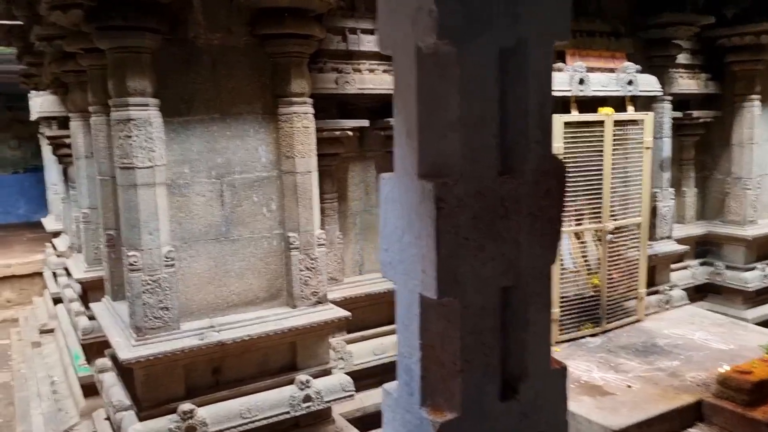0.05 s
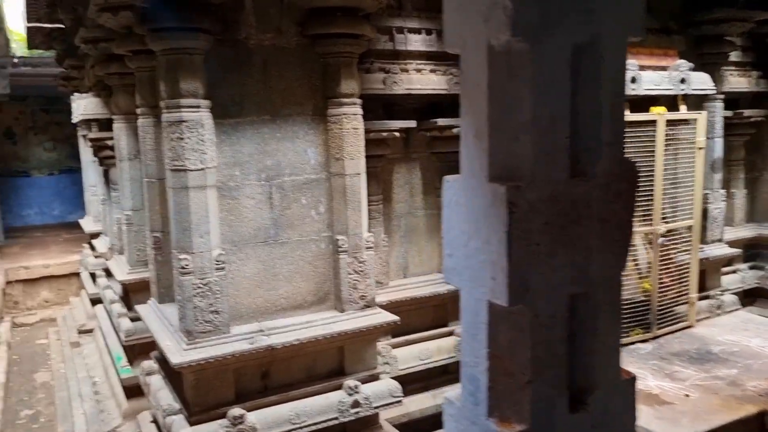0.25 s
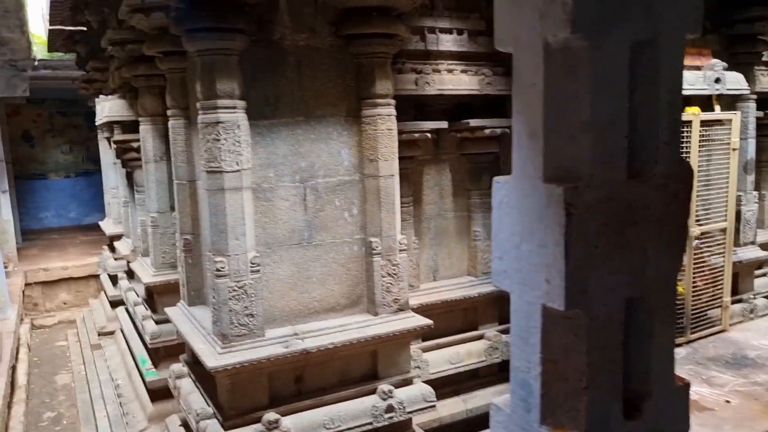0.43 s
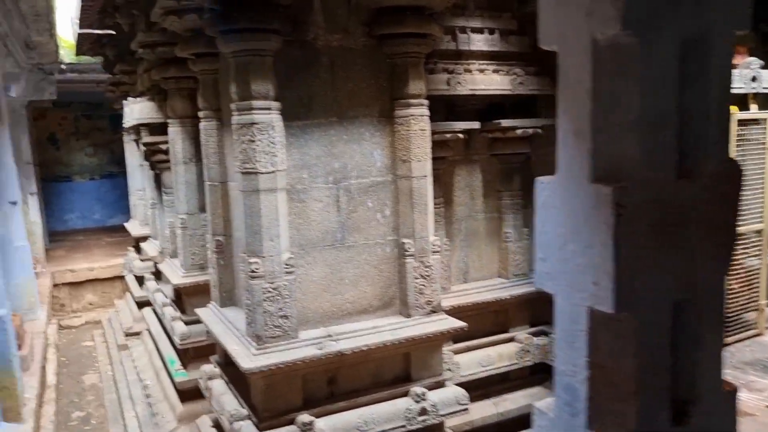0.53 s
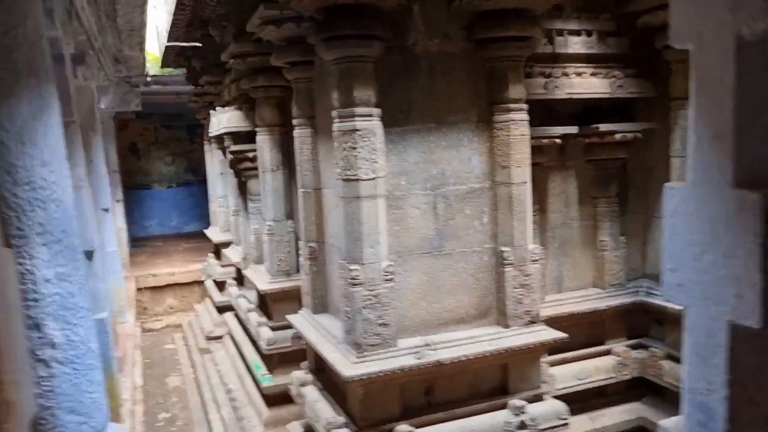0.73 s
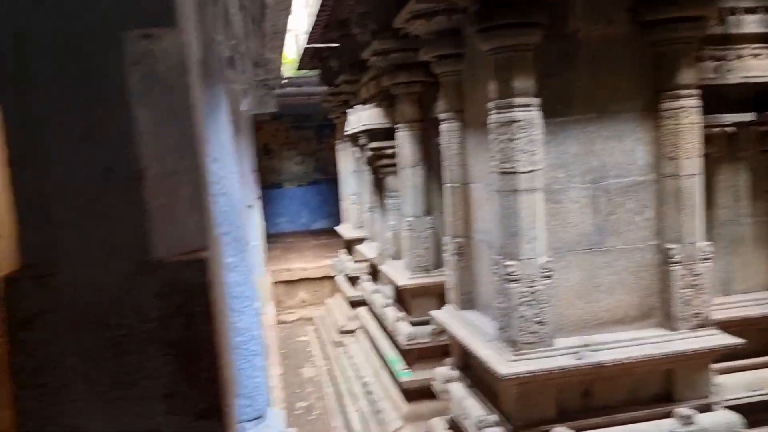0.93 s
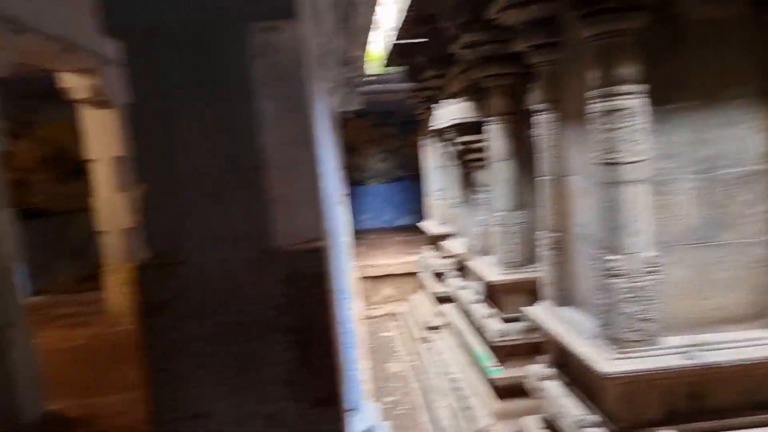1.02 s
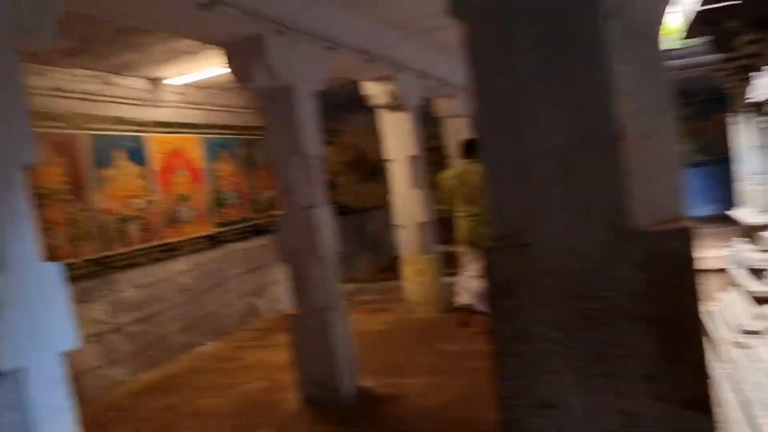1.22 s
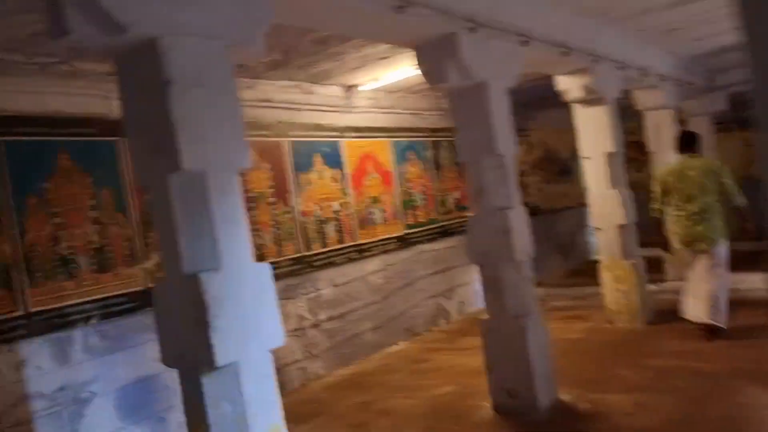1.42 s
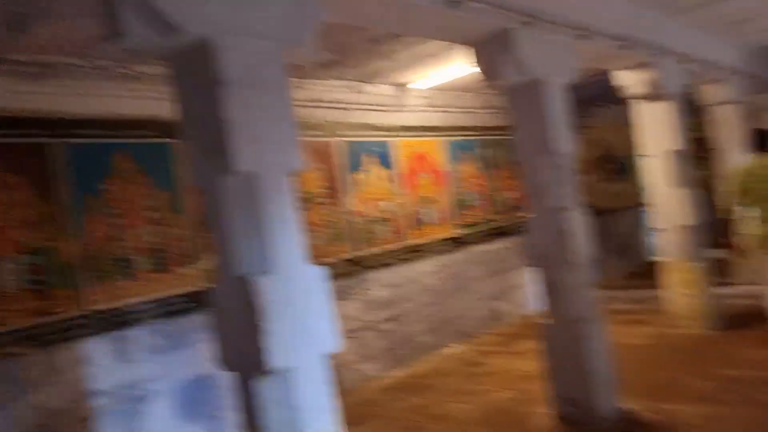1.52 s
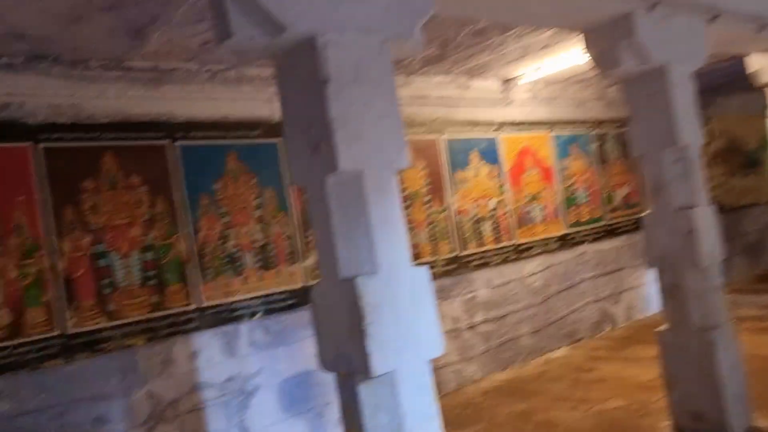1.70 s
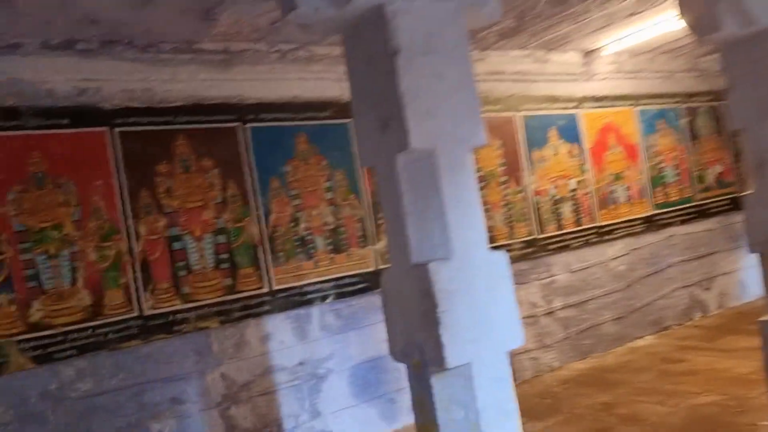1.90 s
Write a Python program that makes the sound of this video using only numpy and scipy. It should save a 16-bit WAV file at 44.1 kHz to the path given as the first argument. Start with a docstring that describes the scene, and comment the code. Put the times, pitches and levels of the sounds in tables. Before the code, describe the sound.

Single clear metal bell stroke in a pillared stone hall, its shimmering tones slowly dying away

```python
"""A low hum and hall noise come first; then a temple bell is struck once and rings through a
pillared stone hall, heard by someone walking past. Its lowest partial is a beating pair; its partials
are sines that swell and fade as the ears cross standing waves, each with a wash of narrow noise.
A noise crash marks the blow, and a dull, distant rumble of filtered noise follows.
Faint shuffles and high hisses, short swells of coloured noise, lie underneath."""
import sys
import numpy as np
from scipy import signal
from scipy.fft import rfft, irfft
from scipy.io import wavfile
from scipy.ndimage import uniform_filter1d

SR = 44100
rng = np.random.default_rng(int(sys.argv[2]) if len(sys.argv) > 2 else 0)


def master_out(mix):
    """Clip the mix to full scale and print it as 16-bit PCM to the path in sys.argv[1]."""
    frames = np.transpose(np.atleast_2d(mix))
    ceiling = np.clip(frames, -1, 1)
    pcm = np.round(ceiling * 32767).astype(np.int16)
    wavfile.write(sys.argv[1], SR, pcm)


N = 85995

STRIKE_S = 0.184  # the blow
HALL_T60_S, HALL_SLOPE = 1.91, 0.18  # decay at 1 kHz, exponent of its fall with frequency
LIKENESS_HZ = 320  # well below this the two ears hear nearly the same noise
SWAY_PER_S = 13.74  # wander points passed per second at 2 kHz
TOP_HZ = 15750


def undb(db):
    """Decibels to gain."""
    return 10 ** (np.asarray(db) / 20)


def curve(rows, t):
    """Gains that follow the dB columns of a table, one row of output per column."""
    rows = np.array(rows, float)
    return undb([np.interp(t, rows[:, 0], db) for db in rows.T[1:]])


def swells(rows, t):
    """Soft bell-shaped rises and falls of level, one for each row."""
    return sum(undb(db) * np.exp(-((t - at) / length) ** 2) for at, length, db in rows)


def unit(x):
    """Scale to rms 1."""
    return x / np.sqrt(np.mean(np.abs(x) ** 2))


def walk(rate):
    """A smooth random wander for each ear, rms 1 over both; rate in points per second."""
    points = rng.standard_normal(size=(2, 256))
    position = np.arange(N) / SR * rate
    steps = np.array([np.interp(position, np.arange(len(p)), p) for p in points])
    return unit(uniform_filter1d(steps, int(SR / rate / 2)))


def noise(points):
    """Diffuse stereo noise of a given colour; the bass is nearly alike in both ears."""
    hz = np.arange(N // 2 + 1) * SR / N + 1
    f, db = np.array(points, float).T
    colour = undb(np.interp(np.log(hz), np.log(f), db))
    mid, side = rfft(rng.standard_normal((2, N)))
    alike = 0.93 / (1 + (hz / LIKENESS_HZ) ** 4)  # correlation of the ears
    opposite = np.array([[1], [-1]])
    ears = mid * np.sqrt(1 + alike) + opposite * side * np.sqrt(1 - alike)
    return unit(irfft(ears * colour, N))


def narrow(hz, width_hz):
    """Noise in one resonance, unrelated in the two ears."""
    off = (np.arange(N // 2 + 1) * SR / N - hz) / (width_hz / 2)
    skirt = np.sqrt((1 + off ** 2) * (1 + (off / 12) ** 2))  # steeper far from the centre
    return unit(irfft(rfft(rng.standard_normal((2, N))) / skirt, N))


def build(age, rise_s):
    """An exponential approach to full level."""
    return 1 - np.exp(-age / rise_s)


def decay(age, t60):
    """An exponential fall of 60 dB in t60 seconds."""
    return np.exp(-np.log(1000) * age / t60)


def hall_t60(hz):
    """The hall holds low sounds longer than high ones."""
    return HALL_T60_S * (hz / 1000) ** -HALL_SLOPE


def hall_noise(t):
    """Steady low-heavy noise of the hall, its level drifting."""
    # Colour of the air in the hall. Each row: frequency in Hz, relative level in dB per Hz.
    hall_colour = [(25, -25), (48, -3), (65, -3.5), (100, -10.5), (180, -6), (300, -2.5), (450, -5),
                   (650, -11), (1000, -17.5), (2000, -28.5), (4000, -33.5), (8000, -39), (15000, -51)]
    # How loud it sits before the stereo lean. Each row: time in seconds, level in dB.
    hall_level = [(0, -47), (.17, -48.5), (.5, -55.5), (.9, -49.5), (1.4, -46.5), (1.95, -52)]
    return noise(hall_colour) * curve(hall_level, t)


def drone(t):
    """A low hum: one narrow noise resonance, the same in both ears, so it wavers."""
    # Fader ride of the hum before the stereo lean. Each row: time in seconds, level in dB.
    drone_level = [(0, -47.5), (.2, -53), (.7, -54), (1.1, -67.5), (1.5, -53), (1.7, -48.5), (1.95, -50.5)]
    return narrow(150.3, width_hz=5)[0] * curve(drone_level, t)


def rustle(t):
    """Soft shuffles and faint high hisses: swelling coloured noise with a fast flutter."""
    # Shuffles, before flutter and lean. Each row: centre in seconds, length in seconds, level in dB.
    shuffles = [(1.562, 0.079, -57.5), (1.715, 0.074, -61), (1.875, 0.083, -57.5)]
    # Shuffle colour. Each row: frequency in Hz, relative level in dB per Hz.
    shuffle_colour = [(500, -12), (1500, 10.5), (4000, 0.5), (7500, -2), (10000, -13), (15000, -10)]
    # Hisses, before flutter and lean. Each row: centre in seconds, length in seconds, level in dB.
    hisses = [(.63, .1, -72), (1.08, 0.1, -66.5), (1.71, .03, -70)]
    # Hiss colour. Each row: frequency in Hz, relative level in dB per Hz.
    hiss_colour = [(2000, -11.5), (5000, -2), (10000, -1), (15500, -7.5)]
    shuffling = swells(shuffles, t) * noise(shuffle_colour)
    hissing = swells(hisses, t) * noise(hiss_colour)
    flutter = undb(1.3 * walk(50))
    return (shuffling + hissing) * flutter


def sway(hz):
    """Walking through standing waves: shorter waves go by faster."""
    return walk(np.clip(SWAY_PER_S * np.sqrt(hz / 2000), 2, 60))


def partial(hz, rows, t, age, sway_rad):
    """A strong partial (complex) whose level and width change as the ears cross its standing waves."""
    flutter_db = 2.02
    rows = np.array(rows, float)
    width = np.interp(t, rows[:, 0], np.clip(rows[:, -1], 0, 1))
    ear_shift = np.array([[0.5], [-0.5]]) * np.pi * width  # full width puts the ears in opposite phase
    phase = 2 * np.pi * hz * age + sway_rad * sway(hz)[0] + ear_shift
    level = curve(rows[:, :-1], t)
    return np.sqrt(2) * np.exp(1j * phase) * level * undb(flutter_db * sway(hz))


def tone(hz, age):
    """A weak mode at both ears, its level and phase wandering with the walk."""
    sway_db, sway_rad = 6, 1
    wave = np.sin(2 * np.pi * hz * age + sway_rad * sway(hz))
    return np.sqrt(2) * wave * undb(sway_db * sway(hz))


def echo(hz, db, age):
    """The diffuse wash that a mode's sudden start leaves among the pillars."""
    wash = narrow(hz, width_hz=23)
    return undb(db) * wash * build(age, rise_s=0.038) * decay(age, hall_t60(hz))


def low_pair(t, age):
    """The lowest partial and its weaker, flatter twin beat against each other."""
    low_hz, beat_hz, twin_db = 809.5, 6.97, -7.5
    # Lowest partial along the walk. Each row: time in seconds, left in dB, right in dB, width 0-1.
    low_level = [(0.24, -28, -24.5, 0.72), (0.35, -31.5, -26.5, 0.21), (0.508, -27, -20, 1),
                 (0.62, -26, -25.5, 0.76), (0.72, -28.5, -24.5, 0.13), (0.79, -34.5, -42, 0.48),
                 (0.899, -33, -25, 0.81), (1.072, -37, -22.5, 0.65), (1.201, -40, -28.5, 0.69),
                 (1.35, -29.5, -30, 0.61), (1.49, -28.5, -25.5, 0.68), (1.63, -44.5, -32, 0.7),
                 (1.76, -34, -33, 0.62), (1.89, -36.5, -32.5, 0.76)]
    pair = unit(1 + undb(twin_db) * np.exp(-2j * np.pi * beat_hz * age))
    direct = (pair * partial(low_hz, low_level, t, age, sway_rad=0.55)).imag
    return direct * build(age, rise_s=0.047) + echo(low_hz, -37, age)


def strong_partials(t, age):
    """The loudest partial and two brighter ones start fast, each leaving its wash."""
    # Loudest partial along the walk. Each row: time in seconds, left in dB, right in dB, width 0-1.
    main_level = [(0.199, -24.5, -25, 0.28), (0.23, -18.5, -15, 0.25), (0.279, -18, -19.5, 0.36),
                  (0.339, -21, -18, 0.84), (0.39, -19.5, -13, 0.5), (0.491, -26, -11.5, 0),
                  (0.55, -28, -22.5, 0.69), (0.619, -31, -25.5, 0.05), (0.71, -46.5, -26.5, 0.36),
                  (0.76, -24.5, -27.5, 1), (0.802, -21, -27, 0), (0.87, -27, -30.5, 0.77),
                  (0.909, -29, -29.5, 1), (0.96, -25.5, -34, 0.51), (1.019, -35, -38, 0.1),
                  (1.09, -40.5, -28.5, 0.25), (1.19, -32.5, -30.5, 0.1), (1.25, -45, -41.5, 1),
                  (1.3, -37, -37, 0.86), (1.35, -57, -33, 0.75), (1.38, -43.5, -48, 0.81),
                  (1.5, -46.5, -37.5, 0), (1.56, -64, -47, 0.48), (1.68, -56, -40, 0.7),
                  (1.77, -67, -56.5, 1), (1.92, -56.5, -64, 0.9)]
    # First bright partial. Each row: time in seconds, left in dB, right in dB, stereo width 0-1.
    third_level = [(0.2, -45, -35, 0.63), (0.24, -37.5, -39, 0.86), (0.291, -25.5, -28, 0.44),
                   (0.341, -33, -25.5, 0.15), (0.4, -38, -40, 0.96), (0.47, -38, -29.5, 0.18),
                   (0.6, -50, -56, 0.53), (0.66, -42, -42.5, 0.23), (0.75, -57.5, -62, 0.5),
                   (0.85, -51, -53, 0.48), (1.001, -61, -64, 0.72), (1.1, -79, -80, 0.3),
                   (1.9, -110, -110, 0.4)]
    # Second bright partial. Each row: time in seconds, left in dB, right in dB, stereo width 0-1.
    fourth_level = [(0.199, -33, -35, 0.33), (0.24, -31.5, -41, 0.31), (0.32, -30, -41, 0.64),
                    (0.38, -33.5, -44, 0.7), (0.44, -34, -30.5, 0.74), (0.52, -42.5, -38.5, 0.7),
                    (0.58, -37.5, -42.5, 0.16), (0.65, -61, -51, 0.9), (0.75, -44.5, -60, 0.42),
                    (0.87, -64.5, -65, 1), (0.98, -68, -57.5, 0.74), (1.15, -72.5, -78, 0.39),
                    (1.9, -110, -110, 0.61)]
    out = 0
    # frequency in Hz, level along the walk, echo in dB
    for hz, rows, echo_db in [(1925, main_level, -21),
                              (3045, third_level, -33.5),
                              (3445.5, fourth_level, -33.5)]:
        direct = partial(hz, rows, t, age, sway_rad=0.55).imag
        out += direct * build(age, rise_s=0.004) + echo(hz, echo_db, age)
    return out


def weak_modes(age):
    """The bell's other modes: swaying sines that die away, each with its wash."""
    # Modes of the metal. Each row: frequency in Hz, level in dB before sway, t60 in seconds,
    # level of the diffuse echo in dB before its build-up and decay.
    modes = [(1774, -40.5, 1.3, -27.5), (1782, -26, 1.4, -31.5), (4657, -41.5, 0.81, -59),
             (4770, -46.5, 1.3, -55), (4770, -50.5, 1.1, -55.5), (4906, -46, 0.81, -46.5),
             (4910, -41, 1.1, -54.5), (5292, -42.5, 1, -52), (5342, -43, 0.85, -55.5),
             (5491, -54.5, 1.0, -70), (5970, -60.5, 1.1, -66.5), (6928, -65, 0.89, -66),
             (7040, -56.5, .8, -57.5), (7430, -53, 1, -66), (7930, -59, .8, -70.5),
             (9157, -68.5, 0.82, -73.5), (9388, -66, 0.65, -77), (9750, -65, 0.63, -78),
             (11600, -78, .7, -81.5), (11800, -81.5, .7, -83), (12286, -71, .7, -78.5)]
    out = 0
    for hz, db, t60, echo_db in modes:
        envelope = build(age, rise_s=0.034) * decay(age, t60)
        out += undb(db) * tone(hz, age) * envelope + echo(hz, echo_db, age)
    return out


def bell(t, age):
    """The struck metal sounds all its modes at once: beating low pair, strong partials, weak modes."""
    return low_pair(t, age) + strong_partials(t, age) + weak_modes(age)


def crash(age):
    """The clapper's impact, smeared by stone walls; the treble dies first."""
    # Colour of the impact. Each row: frequency in Hz, relative level in dB per Hz.
    crash_colour = [(200, -34), (400, -19), (560, -7.5), (1000, -11), (1400, -9), (2150, -6), (2550, -15),
                    (3000, -5), (3750, -9.5), (4300, -20.5), (5200, -19.5), (5800, -35.5), (7200, -19.5),
                    (8500, -50.5), (15000, -51)]
    spectrum = rfft(noise(crash_colour))
    hz = np.arange(N // 2 + 1) * SR / N
    octave = np.round(np.log2(np.maximum(hz, 2 ** 8)))  # the lowest band takes all the bass
    out = 0
    for k in np.unique(octave):
        band = irfft(spectrum * (octave == k), N)
        out += band * build(age, rise_s=0.016) * decay(age, 0.63 * hall_t60(2 ** k))
    return undb(-31.5) * out


def rumble(t):
    """A dull noise from deep in the hall swells, holds and rings out."""
    start_s, rise_s, hold_s, t60_s = 0.48, 0.033, 0.21, 1.48
    # Colour of the distant rumble. Each row: frequency in Hz, relative level in dB per Hz.
    rumble_colour = [(100, -20), (180, -16), (260, -5.5), (400, -1), (560, -4), (750, -9.5), (1100, -14),
                     (1600, -21), (3000, -30.5), (7000, -40.5), (14000, -55)]
    age = np.maximum(t - start_s, 0)
    shape = build(age, rise_s) * decay(np.maximum(age - hold_s, 0), t60_s)
    return undb(-36) * shape * noise(rumble_colour)  # level before the stereo lean


def scene():
    """The bell over the sounds of the hall, which lean to the right."""
    t = np.arange(N) / SR
    age = np.maximum(t - STRIKE_S, 0)  # time since the blow
    surroundings = hall_noise(t) + drone(t) + rustle(t) + rumble(t)
    lean = undb([[-1.3], [1.3]])
    return bell(t, age) + crash(age) + surroundings * lean


def record(dry):
    """The recorder cuts the top with a steep low-pass."""
    return signal.sosfilt(signal.ellip(10, 0.2, 80, TOP_HZ, fs=SR, output="sos"), dry)


dry = scene()
out = record(dry)
master_out(out)
```